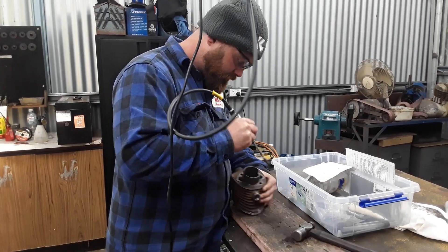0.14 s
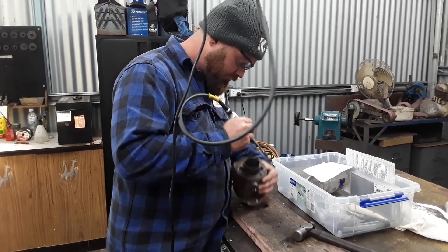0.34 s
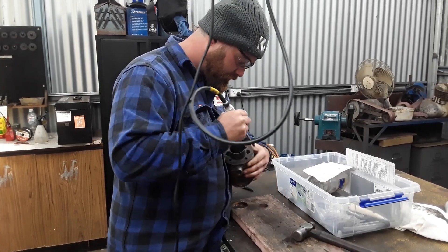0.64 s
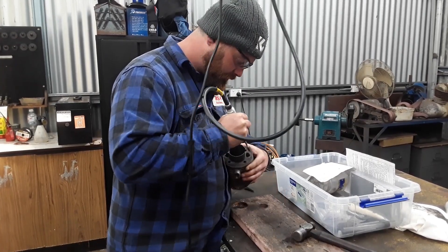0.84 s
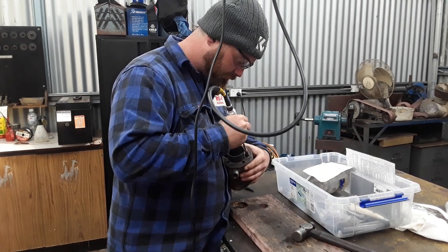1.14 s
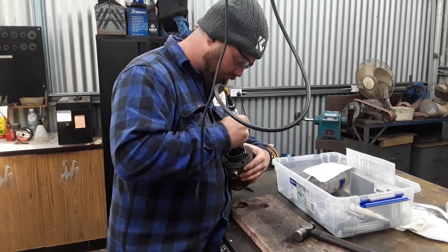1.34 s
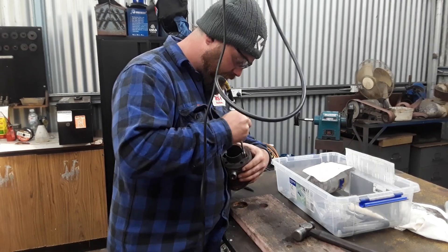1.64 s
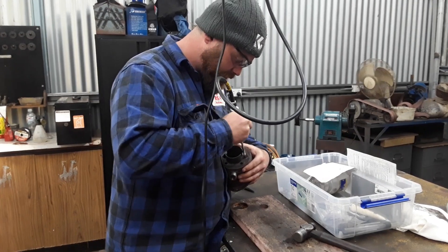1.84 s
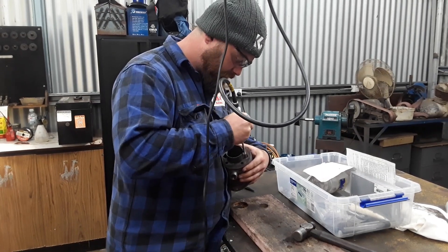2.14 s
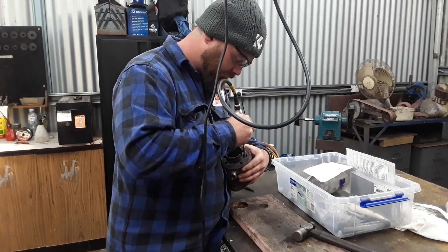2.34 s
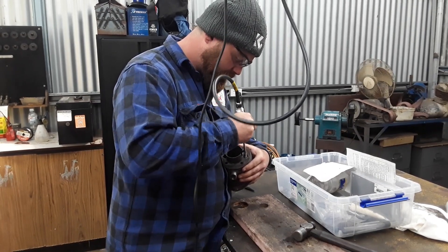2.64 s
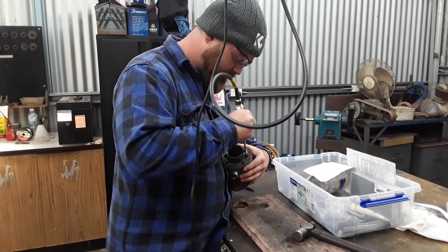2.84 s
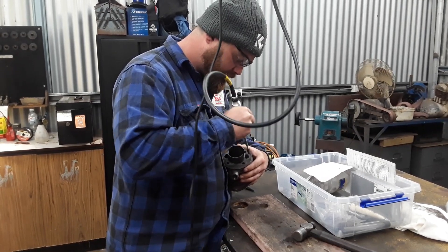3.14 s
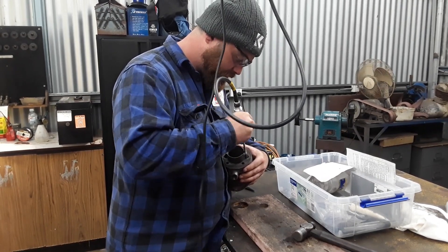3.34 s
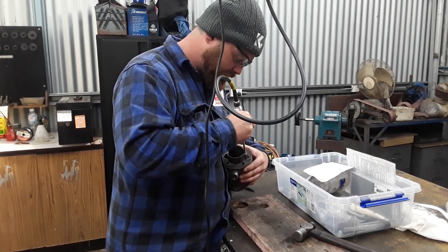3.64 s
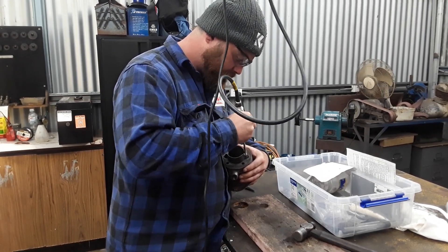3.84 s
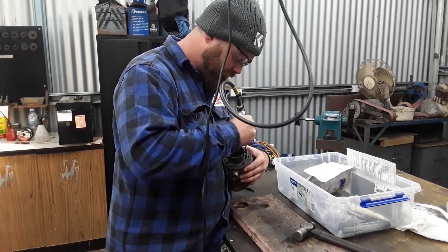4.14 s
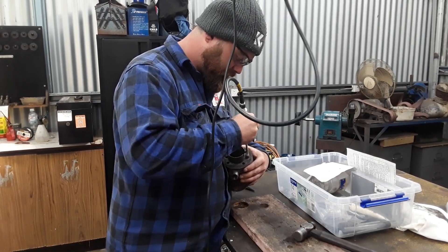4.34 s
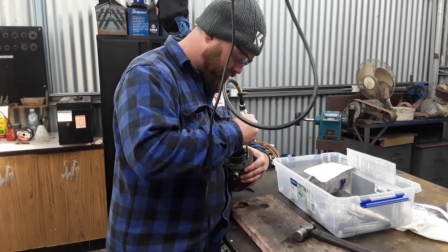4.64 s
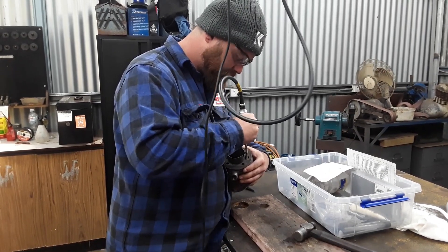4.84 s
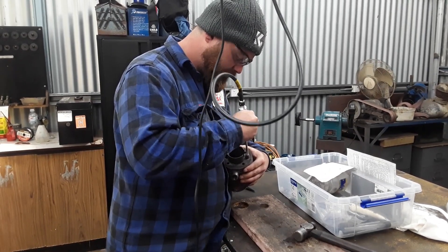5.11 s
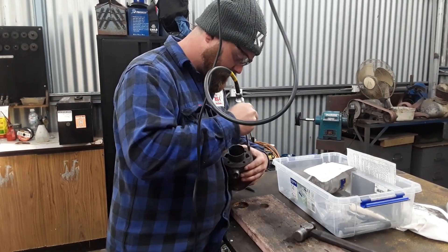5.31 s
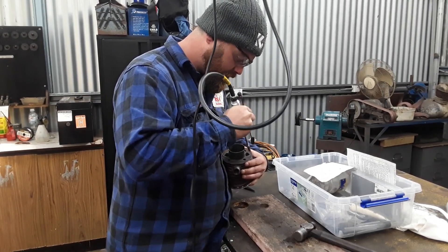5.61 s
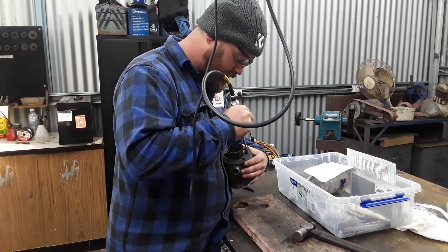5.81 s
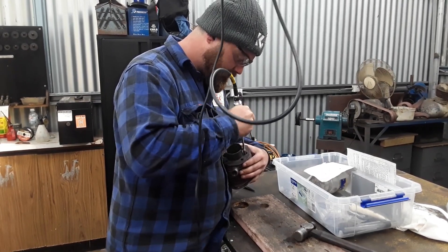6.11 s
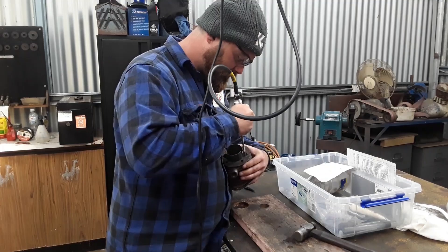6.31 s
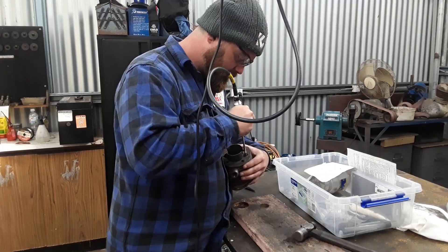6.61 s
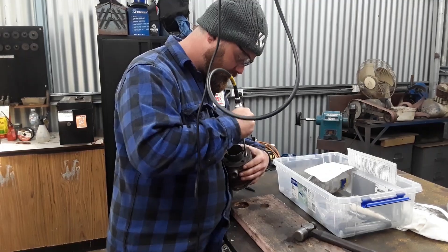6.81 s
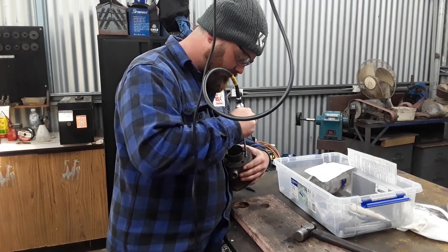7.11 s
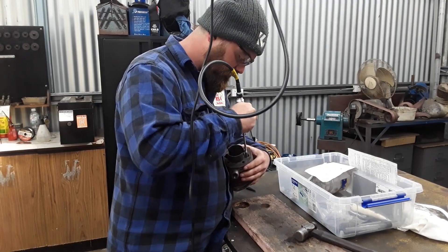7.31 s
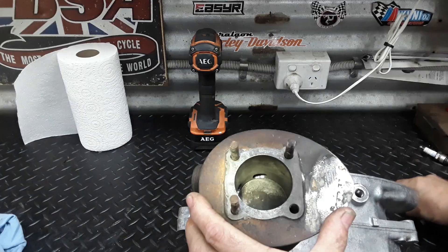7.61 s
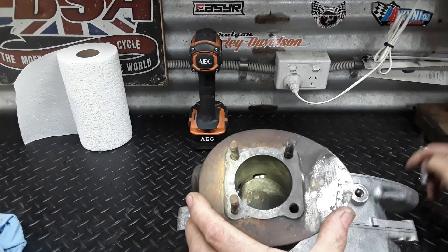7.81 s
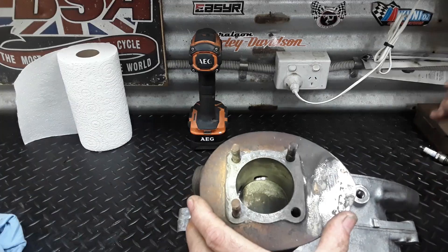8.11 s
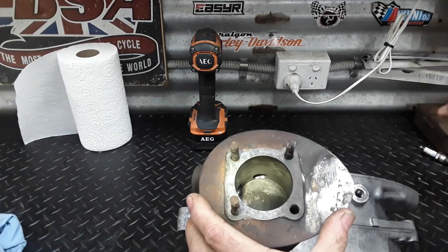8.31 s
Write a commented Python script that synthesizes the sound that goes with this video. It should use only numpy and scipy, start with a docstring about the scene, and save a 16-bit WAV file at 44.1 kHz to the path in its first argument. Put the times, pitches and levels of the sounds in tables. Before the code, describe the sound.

From the start an air die grinder spins freely, with a thin fluttering whine of many high overtones, strong bright air hiss and a faint low drone, in a sheet-metal workshop with short bright echoes. At about 1.4 s the burr bites into an iron cylinder: rough scrape, piercing shriek, sizzle and ringing, with short squeals near 1.5, 2.0 and 2.4 s and a low hollow howl. It lifts around 2.9 s, leaving whine, hiss and light skimming. A second, longer press runs from 3.4 to 5.2 s, uneven and juddering, with a sharp squeal at 4.8 s. Whine and hiss return until a third press from 6.2 s, again shrieking and ringing, with a brief squeal near 6.7 s. At 7.5 s everything stops abruptly. A very quiet room follows with faint noise and a brief low hum, a tiny tick at 8.1 s and a soft knock just before the end.

```python
"""In a sheet-metal workshop an air die grinder whines and is pressed three times to an iron engine cylinder.
The whine is sine overtones of a drawn spindle speed; hiss and scrape are coloured noise pulsing once a turn.
Pressing adds a shriek, sizzle, howl and squeals, and noise through narrow bands makes the cylinder ring.
The noise stops abruptly and gives way to a quiet room of faint noise and hum, with a light tick and a knock."""
import sys
import numpy as np
from scipy import signal
from scipy.fft import rfft, irfft, next_fast_len
from scipy.io import wavfile
from scipy.ndimage import uniform_filter1d, map_coordinates

SR = 44100
rng = np.random.default_rng(int(sys.argv[2]) if len(sys.argv) > 2 else 0)


def digitize_waveform(pressure):
    """Quantize a signal to 16-bit integers and store it at the path in sys.argv[1].

    Rows of a 2-D input are taken as channels; values are limited to [-1, 1].
    """
    field = np.atleast_2d(pressure).T
    bounded = np.clip(field, -1, 1)
    quanta = np.round(bounded * 32767).astype(np.int16)
    wavfile.write(sys.argv[1], SR, quanta)


N = 373086
TIME = np.arange(N) / SR  # s


def amp(db):
    """Decibels to gain."""
    return 10 ** (np.asarray(db) / 20)


def unit(x):
    """Scale to rms 1."""
    return x / np.sqrt(np.mean(x ** 2) + 1e-20)


def along(points, hz):
    """(Hz, value) points read on a log frequency axis."""
    f, v = np.transpose(points)
    return np.interp(np.log(hz + 1), np.log(f + 1), v)


def curves(rows):
    """One value per sample for each column after the time."""
    s, *cols = np.transpose(rows)
    return [np.interp(TIME, s, c) for c in cols]


def wobble(rate):
    """A smooth random curve, rate knots a second."""
    coarse = TIME[::64]
    knots = rng.standard_normal(int(TIME[-1] * rate) + 4)
    return np.interp(TIME, coarse, map_coordinates(knots, [coarse * rate]))


def swell(s, length):
    """One smooth rise and fall, centred on s."""
    return np.sin(np.pi * np.clip((TIME - s) / length + .5, 0, 1))


def noise():
    """Fresh white noise."""
    return rng.standard_normal(N)


def filtered(x, response):
    """x with its spectrum multiplied by a response of frequency."""
    m = next_fast_len(N + SR // 2)
    return irfft(rfft(x, m) * response(np.fft.rfftfreq(m, 1 / SR)), m)[:N]


def coloured(x, spectrum):
    """x through the given colour, at rms 1."""
    return unit(filtered(x, lambda hz: amp(along(spectrum, hz))))


def resonance(f, hz, width):
    """Complex response of one resonance, 1 at its peak."""
    return 1j * f * width / (hz * hz - f * f + 1j * f * width)


def resonating(x, modes):
    """x through a set of resonances side by side, at rms 1."""
    return unit(filtered(x, lambda f: sum(amp(db) * resonance(f, hz, width) for hz, width, db in modes)))


def band(x, hz, width):
    """x through one resonance twice, for steep skirts, at rms 1."""
    return unit(filtered(x, lambda f: resonance(f, hz, width) ** 2))


# Colour of the quiet room. Each row: frequency in Hz, relative level in dB.
QUIET = [(15, -36), (25, -6), (33, -13), (86, 1), (126, -8), (161, -0.5), (307, -7), (1060, -22),
         (1390, -22), (1680, -26), (4820, -40), (6660, -36), (8270, -21), (9990, -40), (15800, -38)]
# Small handling sounds. Each row: start in seconds, level in dB, pitch in Hz, width in Hz, t60 in seconds.
TAPS = [(8.087, -57, 1480, 420, 0.045), (8.436, -54.5, 696, 800, 0.3)]
QUIET_S = 7.603  # the quiet room starts to fade in


def quiet_room():
    """Faint room noise and hum, with a tick and a knock: noise bursts that die away after a sharp onset."""
    out = amp(-66.0) * coloured(noise(), QUIET) + amp(-83.0) * band(noise(), 8300, 900)
    # a faint low hum swells and fades
    hum_db = np.interp(TIME, [7.65, 7.9, 8.05, 8.2], [-82, -66.5, -69, -85.5])
    out += amp(hum_db) * np.sin(2 * np.pi * 157 * TIME)
    for s, db, hz, width, t60 in TAPS:
        age = np.maximum(TIME - s, 0)
        contact = band(noise(), hz, width) + amp(-20.5) * noise()
        onset = 1 - np.exp(-age / .0005)
        out += amp(db - 60 * age / t60) * onset * contact
    fade_in = np.clip((TIME - QUIET_S) / .015, 0, 1)
    return out * fade_in


# Low drone of the workshop. Each row: frequency in Hz, width in Hz, relative level in dB.
DRONE = [(100.5, 6, -2), (112.8, 8, -8)]


def drone():
    """Low noise narrowed by two resonances, slowly changing in level."""
    level_db = np.interp(TIME, [1.5, 2.6, 7.5], [-61, -56.5, -58.5])
    return amp(level_db) * resonating(noise(), DRONE)


# Echo decay of the steel walls. Each row: frequency in Hz, t60 in seconds.
WALLS = [(200, 0.14), (2000, .35), (8000, .25), (15000, 0.09)]


def echoes(x):
    """The steel walls answer with a short, bright tail: noise dying at its own rate in each band."""
    hz, t, z = signal.stft(rng.standard_normal(SR // 2), SR, nperseg=256)
    decay = amp(-60 * t / along(WALLS, hz)[:, None])
    tail = signal.istft(z * decay, SR, nperseg=256)[1]
    return signal.fftconvolve(x, tail / np.linalg.norm(tail))[:N]


def workshop(x, wet_db):
    """Direct sound and echoes together, scaled for the same total power."""
    return (x + amp(wet_db) * echoes(x)) / np.hypot(1, amp(wet_db))


# Colour of the escaping air. Each row: frequency in Hz, relative level in dB.
EXHAUST = [(30, -38), (80, -35.5), (170, -20.5), (280, -16), (420, -16), (800, -15.5), (1700, -8.5),
           (3000, -8.5), (4000, -12.5), (4900, -8), (6000, -8.5), (7000, -7), (8100, 1), (9300, -6.5),
           (10800, -17.5), (13000, -15.5), (15800, -19.5)]
# Hollow notes of the escaping air. Each row: frequency in Hz, width in Hz, relative level in dB.
HOLLOW = [(658, 96, -6.5), (927, 110, -1), (1049, 117, 1.5)]


def exhaust(angle, hiss_db, hollow_db, puff):
    """Spent air leaves the tool in a hiss that pulses with every turn, with a few hollow notes in it."""
    hiss = coloured(noise() * (1 + puff * np.cos(angle)), EXHAUST)
    hollow = unit(sum(amp(db) * band(noise(), hz, width) for hz, width, db in HOLLOW))
    return amp(hiss_db + .4 * wobble(8.6)) * hiss + amp(hollow_db) * hollow


# Colour of the air-puff buzz. Each row: frequency in Hz, relative level in dB.
BUZZ = [(150, -34.5), (700, -10.5), (2000, -9.5), (5500, -17.5), (7000, -1), (8300, 0.5), (9900, -0.5),
        (11500, -7.5), (14000, -16), (15800, -19.5)]


def sum_of_orders(turn, count):
    """turn + turn^2 + ... + turn^count, as a geometric series."""
    return turn * (1 - turn ** count) / (1 - turn)


def buzz(angle):
    """One sharp puff of air a turn gives a full row of overtones, smeared by the walls."""
    puffs = np.real(sum_of_orders(np.exp(1j * angle), count=70))
    return coloured(echoes(puffs), BUZZ)


# Spindle speed before its jitter. Each row: time in seconds, turns a second in Hz.
SPEED = [(0.0, 206.7), (0.24, 208.9), (1.2, 221.8), (1.68, 225.3), (2.28, 222.4), (2.44, 217.4),
         (2.6, 219.8), (2.84, 217.9), (3.4, 223.2), (3.64, 223.1), (4.2, 220.0), (4.92, 213.1),
         (5.12, 213.0), (5.84, 221.8), (6.2, 223.7), (6.92, 219.0), (7.24, 215.1), (7.52, 214.6)]


def spindle(load, free_jitter, load_jitter):
    """Angle of the spindle; the burr catching in the metal makes it run less evenly."""
    speed, = curves(SPEED)
    unsteady = free_jitter * wobble(25) + load_jitter * load * wobble(60)
    return 2 * np.pi * np.cumsum(speed * (1 + unsteady)) / SR


# Strongest overtones, which swell at the speed that tunes them to a resonance of the tool.
# Each row: multiple of the spindle speed, relative level in dB, tuned spindle speed in Hz,
# width of the tuning in Hz, swell in dB.
LEAD = [(12, -44, 215, 4, 3), (22, -40.5, 224.5, 2, 7), (24, -52, 219, 6, 10), (35, -44, 223.5, 4, 15),
        (39, -38, 214.5, 1.6, 10.5), (42, -37.5, 211, 3.2, 10)]
# Steadier overtones. Each row: multiple of the spindle speed, relative level in dB.
ORDERS = [(16, -47.5), (19, -44.5), (31, -39), (32, -40), (36, -40), (37, -38.5), (38, -40), (40, -42.5),
          (44, -40.5), (45, -55), (46, -51.5), (58, -50)]


def whine(angle, lead_db, rest_db, lead_flutter_db, rest_flutter_db):
    """Vanes and bearings sound overtones of the spindle speed, each fluttering by itself."""
    speed, = curves(SPEED)

    def tone(k):
        """One overtone at rms 1, from a random phase."""
        return np.sqrt(2) * np.sin(round(k) * angle + rng.uniform(0, 2 * np.pi))

    def fading(depth_db, rate):
        """Rounded crests and deep notches, as when a gliding tone crosses room resonances."""
        return unit(amp(depth_db * np.tanh(wobble(rate) + .5)))

    lead = np.zeros(N)
    for k, db, hz, width, swell_db in LEAD:
        tuned = np.exp(-((speed - hz) / width) ** 2)
        lead += amp(db + swell_db * tuned) * fading(lead_flutter_db, 22) * tone(k)
    rest = sum(amp(db) * fading(rest_flutter_db, 11) * tone(k) for k, db in ORDERS)
    return amp(lead_db) * lead + amp(rest_db) * rest


# Flares of one overtone. Each row: centre in seconds, length in seconds,
# multiple of the spindle speed, peak level in dB before flutter.
FLARES = [(0.15, .7, 42, -30), (0.1, 0.43, 22, -39), (2.75, .45, 42, -31), (3.52, .5, 22, -33),
          (3.6, .5, 24, -32.5), (5.1, .4, 42, -30.5)]


def flares(angle, flutter_db):
    """Single overtones of the spindle swell and fade as the tool is moved about."""
    out = np.zeros(N)
    for s, length, k, db in FLARES:
        tone = np.sqrt(2) * np.sin(round(k) * angle)
        out += amp(db + flutter_db * wobble(20)) * swell(s, length) * tone
    return out


# Moments when the burr catches and sings. Each row: centre in seconds, length in seconds,
# mean pitch in Hz, peak level in dB.
SQUEALS = [(1.486, 0.1, 1980, -32.5), (2.016, 0.057, 1433, -30), (2.02, .05, 4650, -28),
           (2.076, 0.063, 2070, -29.5), (2.32, 0.082, 1954, -26), (2.396, 0.056, 1964, -25),
           (2.417, 0.082, 1314, -31.5), (2.42, 0.081, 671, -32.5), (4.79, 0.097, 1930, -23),
           (4.839, 0.07, 1770, -35), (4.805, .06, 3650, -31.5), (4.814, 0.036, 4700, -32.5),
           (4.845, 0.072, 6850, -25.5), (4.243, .04, 4870, -31), (6.657, 0.078, 1656, -28.5)]


def squeals(waver):
    """Stick and slip lock briefly onto one mode of the metal, which swells and fades."""
    out = np.zeros(N)
    clock = TIME + waver * np.cumsum(wobble(150)) / SR  # all pitches waver together
    for s, length, hz, db in SQUEALS:
        on = np.abs(TIME - s) < length / 2
        rise_and_fall = np.cos(np.pi * (TIME[on] - s) / length)
        out[on] += amp(db) * rise_and_fall * np.sqrt(2) * np.sin(2 * np.pi * hz * clock[on])
    return out


# Bouts of howling in the bore. Each row: centre in seconds, length in seconds, peak level in dB
# before flutter and the steady part.
HOWLS = [(1.92, .42, -36.5), (2.43, .2, -32.5), (2.72, .45, -39.5), (6.29, .22, -34.5), (6.92, .25, -38),
         (7.19, .14, -36), (7.48, .2, -37.5)]
HOWL_HZ = 672  # mean pitch
HOWL_DB = -24  # steady part, over the force


def howl(force_db, waver, flutter_db):
    """Chatter of the burr keeps one low resonance of the cylinder sounding, rough and wavering."""
    bouts = sum(amp(db) * swell(s, length) for s, length, db in HOWLS)
    level = np.hypot(amp(force_db + HOWL_DB), bouts) * amp(flutter_db * wobble(70))
    pitch = HOWL_HZ * (1 + waver * wobble(130))
    return level * np.sqrt(2) * np.sin(2 * np.pi * np.cumsum(pitch) / SR)


# Three presses into the port, one list each. Each row: time in seconds, force in dB,
# cylinder ring over the force in dB, sizzle over the force in dB; grinding() trims the layers.
PRESSES = [
    [(1.44, -27, -14, -19), (1.48, -26.5, -7, -18.5), (1.62, -26.5, -12, -8.5), (1.95, -21, -9, -14.5),
     (2.08, -21, -6.5, -14), (2.2, -24, -12.5, -17), (2.34, -21, -5.5, -10), (2.82, -23, -5.5, -10),
     (2.88, -25, -2.5, -15)],
    [(3.46, -23.5, -9.5, -17), (3.77, -22.5, -9.5, -14), (3.84, -25, -10.5, -12), (3.93, -21.5, -13, -19),
     (4.02, -25.0, -3, -5.5), (4.17, -25, -5, -2.5), (4.28, -20.5, -4.5, -12), (4.49, -24, -4.5, -14.5),
     (4.59, -20.5, -1, -10.5), (4.78, -20.5, -5, -19.5), (4.96, -23.0, -5.5, -6), (5.2, -25, -3.5, -19.5)],
    [(6.17, -23.5, -10.5, -12.5), (6.26, -21.5, -8.5, -18), (6.44, -24.5, -14, -8.5),
     (6.64, -21, -4.5, -17.5), (6.76, -22.5, -10.5, -11), (6.92, -20.5, -3, -11), (7.07, -24, -10.5, -13),
     (7.14, -20, -8.5, -9), (7.37, -27.5, -11.5, -5), (7.5, -28, -5, -4)],
]
BITE_DB_PER_S, LIFT_DB_PER_S = 148.5, 136.5  # the force rises before a press and falls after it
SKIM_DB = -37.5  # least force from the first press on, as the burr skims the metal


def pressing():
    """Force, ring and sizzle in dB: the burr bites in, is worked about and lifts off, then only skims."""
    forces, rings, sizzles = [], [], []
    for press in PRESSES:
        force_db, ring_db, sizzle_db = curves(press)
        early = np.maximum(press[0][0] - TIME, 0)
        late = np.maximum(TIME - press[-1][0], 0)
        force_db = force_db - BITE_DB_PER_S * early - LIFT_DB_PER_S * late
        forces.append(force_db)
        rings.append(force_db + ring_db)
        sizzles.append(force_db + sizzle_db)
    skim_db = np.where(TIME > PRESSES[0][0][0], SKIM_DB, -120)
    return np.maximum(np.max(forces, axis=0), skim_db), np.max(rings, axis=0), np.max(sizzles, axis=0)


# Colours of the scrape, the shriek and the finest chips. Each row: frequency in Hz, relative level in dB.
SCRAPE = [(150, -40), (300, -22.5), (430, -11.5), (560, -4), (800, -7), (1150, -2.5), (2600, 2),
          (3200, -0.5), (4700, 3), (5800, 0), (7000, 5.5), (9900, 2), (11500, -11), (15500, -14)]
SHRIEK = [(5000, -48.5), (6700, -19), (7400, -7), (7650, -0.5), (8050, 2), (8500, -5.5), (9100, -10.5),
          (10200, -16.5), (12000, -39)]
SIZZLE = [(8000, -29.5), (10500, 4), (12500, -6), (14100, 5), (15200, -4.5)]
# Modes of the cylinder and its fins. Each row: frequency in Hz, width in Hz, relative level in dB.
CYLINDER = [(1343, 32, -4), (1444, 49, -4), (1538, 45, -5), (1672, 50, -2), (1830, 170, 2.5), (1966, 65, 3),
            (2064, 110, 3.5), (2254, 110, -1), (3560, 83, -0.5), (4470, 120, -2.5), (4910, 280, -8.5),
            (6900, 75, -5.5)]
# The burr digs in and the shriek surges. Each row: centre in seconds, length in seconds, surge in dB.
DIGS = [(1.8, 0.2, 6), (2.5, .35, 2.5), (3.5, .12, 3.5), (3.73, 0.12, 2.5), (3.92, .12, 3.5),
        (6.64, .12, 3.5), (7.22, .12, 3), (7.42, .14, 5)]
SHRIEK_DB, SHRIEK_GROWS = -6.5, 0.76  # level at 0 dB force; dB gained per dB of force


def grinding(angle, bite, chip_db, judder_db, roam_db, spit_db, rocking_db):
    """The burr bites once a turn and tears off chips of uneven size, which shake the cylinder."""
    force_db, ring_db, sizzle_db = pressing()
    contact = np.exp(bite * np.cos(angle)) * amp(chip_db * wobble(520) + judder_db * wobble(35))

    def chips():
        """Fresh noise in the rhythm of the contact."""
        return contact * noise()

    scrape = amp(force_db + 0.13) * coloured(chips(), SCRAPE)
    # the shriek comes and goes as the hand rocks the burr
    dig_db = sum(db * swell(s, length) for s, length, db in DIGS)
    shriek_db = SHRIEK_DB + SHRIEK_GROWS * force_db + dig_db + rocking_db * wobble(11)
    shriek = amp(shriek_db) * coloured(chips(), SHRIEK)
    # as the burr roams over the metal it favours now one mode, now another
    shaking = chips()
    modes = sum(amp(db + roam_db * wobble(18)) * band(shaking, hz, width) for hz, width, db in CYLINDER)
    ring = amp(ring_db + 0.06) * unit(modes)
    # the finest chips fly off in spits
    spits = chips() * amp(spit_db * wobble(900))
    sizzle = amp(sizzle_db + 2.0) * coloured(spits, SIZZLE)
    return scrape + shriek + ring + sizzle


# Moments when the working sound thins out. Each row: centre in seconds, length in seconds, depth in dB.
THINNING = [(1.364, 0.015, -18), (2.018, 0.023, -8), (2.415, 0.032, -33), (4.243, 0.014, -12.5),
            (4.283, 0.012, -22), (4.541, 0.012, -14.5), (4.646, 0.017, -17), (4.838, 0.05, -44.5),
            (5.24, 0.026, -7), (6.649, .014, -9), (7.12, 0.015, -16), (7.207, 0.013, -14)]


def thinned(x, whistle_db):
    """Now and then the full sound drops away for an instant and only the strongest whistles hold."""
    z = signal.stft(x, nperseg=1024)[2]
    power = np.abs(z) ** 2
    # whistles stand out from their neighbours in pitch and from the average over all pitches at that moment
    around = np.abs(uniform_filter1d(power, size=70, axis=0))
    threshold = amp(whistle_db) ** 2 * (around / 2 + power.mean(axis=0))
    strong = uniform_filter1d(power, size=3, axis=1) > threshold
    whistles = signal.istft(z * strong, nperseg=1024)[1][:N]
    dip_db = sum(depth * (np.abs(TIME - s) < length / 2) for s, length, depth in THINNING)
    hold = amp(uniform_filter1d(dip_db, size=384))  # edges softened over 9 ms
    return hold * x + (1 - hold) * amp(3.5) * whistles


STOP_S = 7.515  # the working noise breaks off


def scene():
    """The grinder in its workshop, then the quiet room; both channels alike."""
    force_db = pressing()[0]
    load = amp(force_db - force_db.max())
    angle = spindle(load ** 2, free_jitter=.0002, load_jitter=.0025)
    tones = whine(angle, lead_db=0.5, rest_db=0.5, lead_flutter_db=10, rest_flutter_db=9)
    tones += amp(-32.5) * buzz(angle)
    # the burr also thumps against the metal once a turn, harder under load
    thump = amp(-49.5 + 3.2 * wobble(25)) * np.sqrt(load) * np.sin(angle)
    air = exhaust(angle, hiss_db=-25.5, hollow_db=-39.5, puff=0.12)
    metal = grinding(angle, bite=0.17, chip_db=1.5, judder_db=1, roam_db=2.0, spit_db=4.5, rocking_db=.8)
    singing = howl(force_db, waver=.02, flutter_db=2) + flares(angle, flutter_db=2.5) + squeals(waver=0.00478)
    everything = tones + thump + singing + workshop(air + metal, wet_db=-6.0) + drone()
    work = thinned(everything, whistle_db=3.5)
    stop_db = np.interp(TIME - STOP_S, [0, .006, .025, .04], [-0.5, -23, -28, -120])
    mono = work * amp(stop_db) + quiet_room()
    return np.array([mono, mono])


TOP_HZ = 15800  # band limit


def record(dry):
    """The treble falls away steeply at the band limit."""
    def roll_off(hz):
        return 1 / np.sqrt(1 + (hz / TOP_HZ) ** 240)

    return np.array([filtered(channel, roll_off) for channel in dry])


dry = scene()
out = record(dry)
digitize_waveform(out)
```